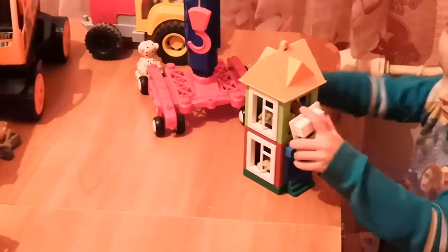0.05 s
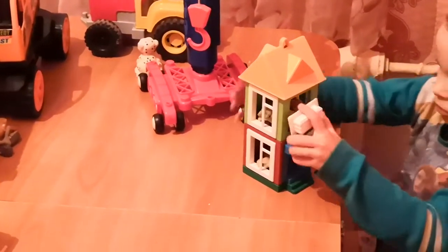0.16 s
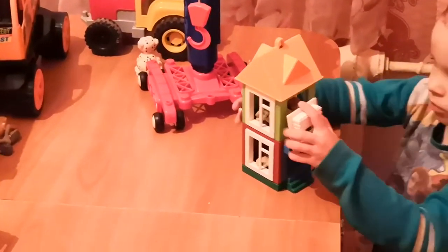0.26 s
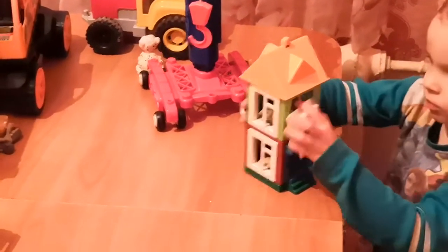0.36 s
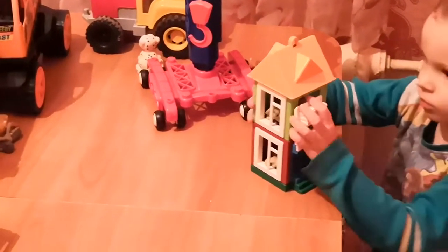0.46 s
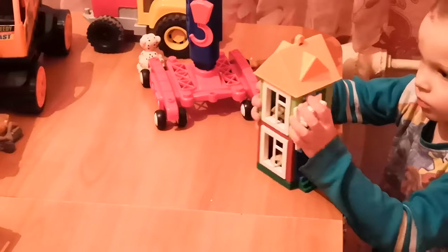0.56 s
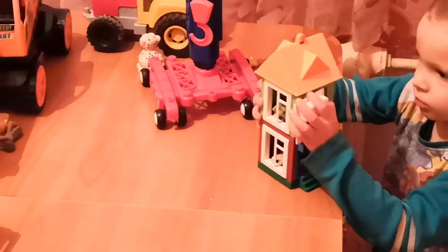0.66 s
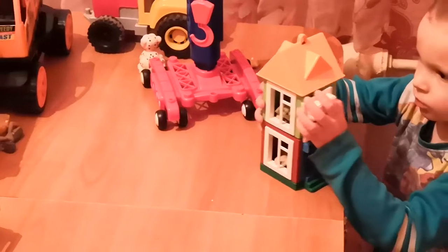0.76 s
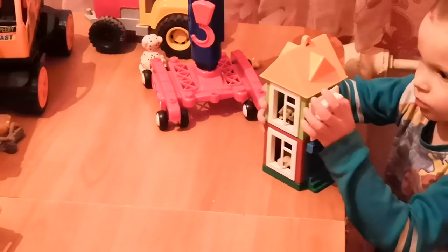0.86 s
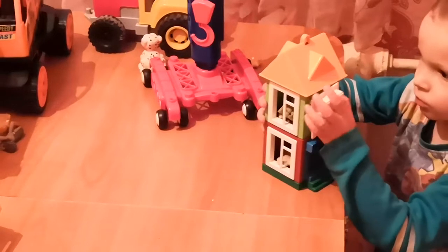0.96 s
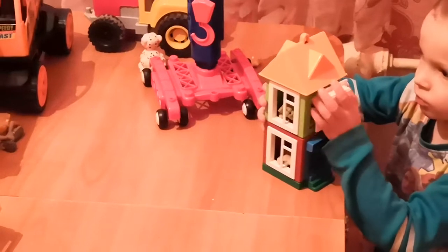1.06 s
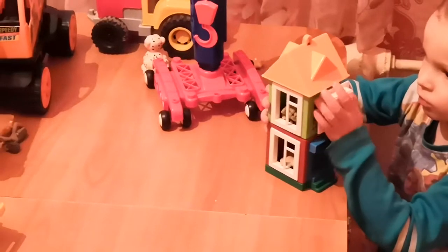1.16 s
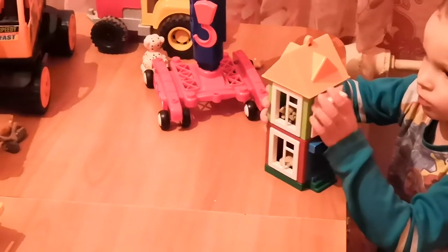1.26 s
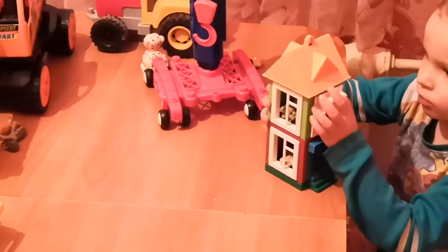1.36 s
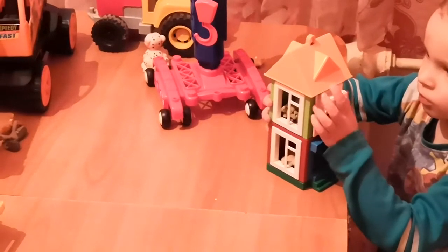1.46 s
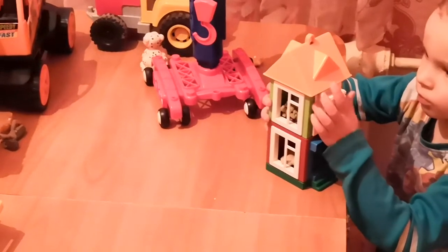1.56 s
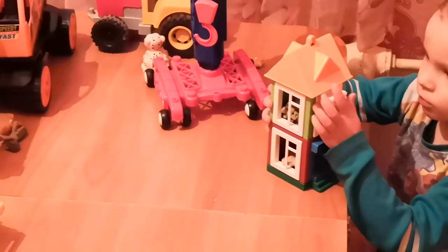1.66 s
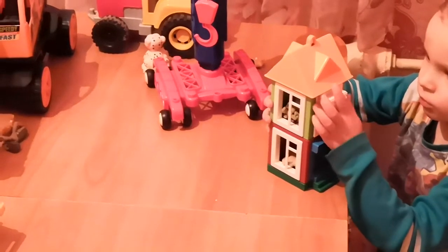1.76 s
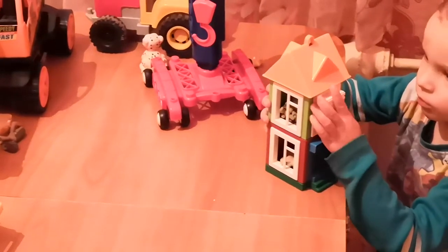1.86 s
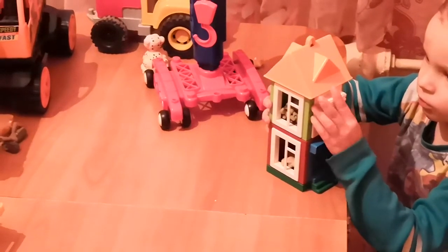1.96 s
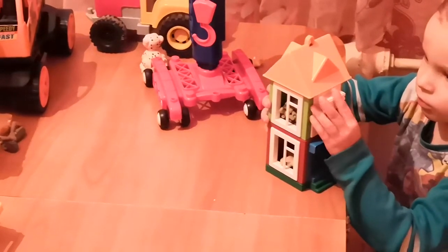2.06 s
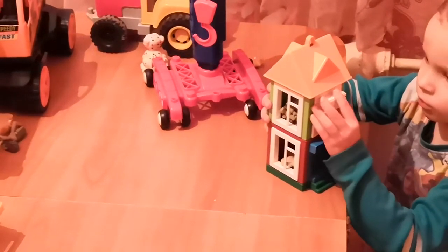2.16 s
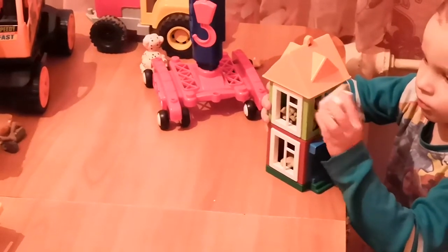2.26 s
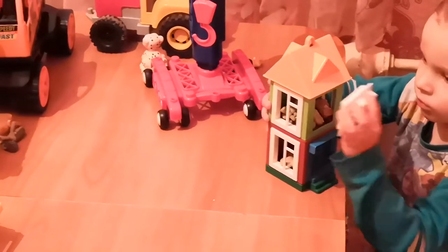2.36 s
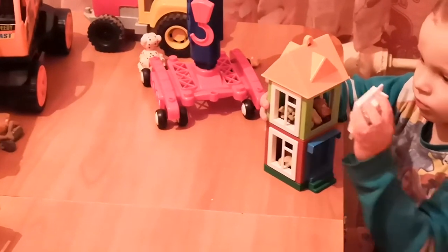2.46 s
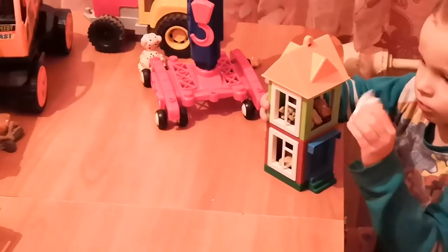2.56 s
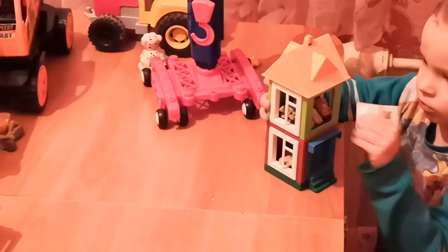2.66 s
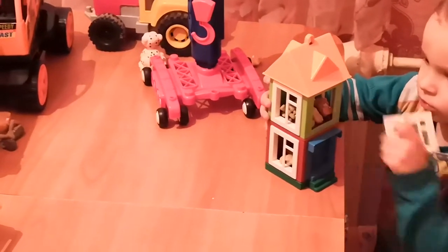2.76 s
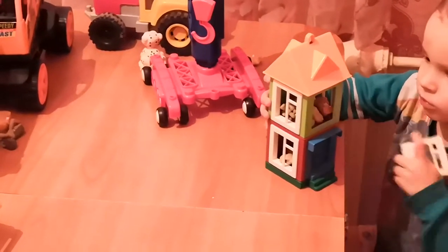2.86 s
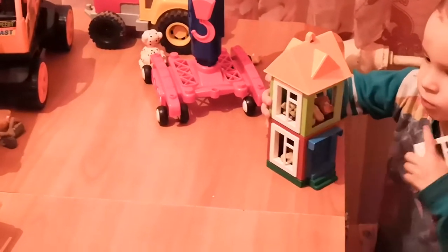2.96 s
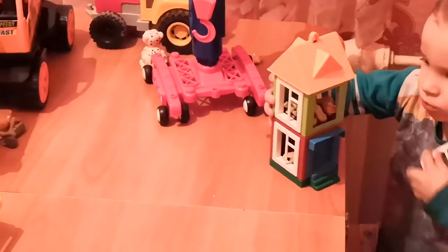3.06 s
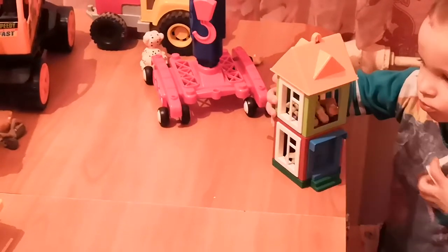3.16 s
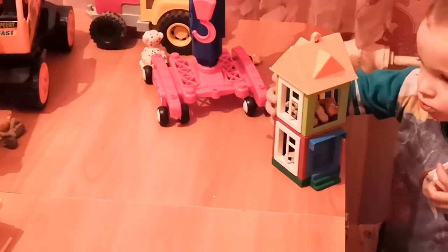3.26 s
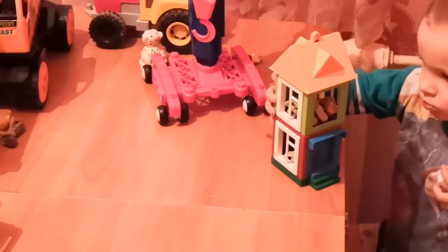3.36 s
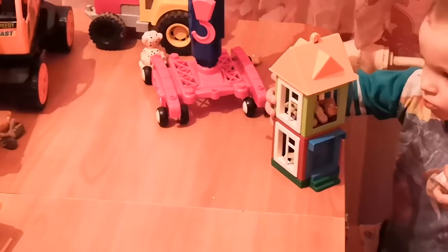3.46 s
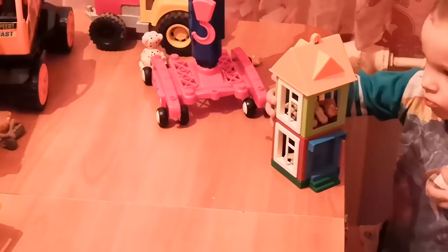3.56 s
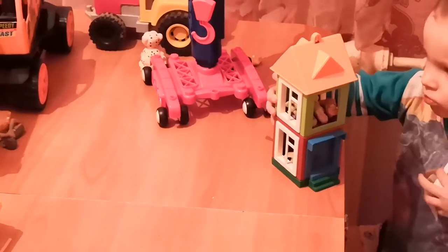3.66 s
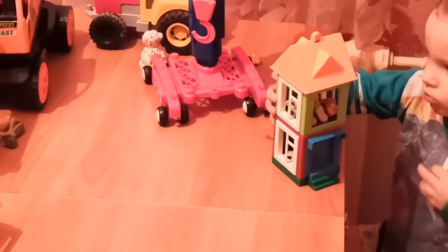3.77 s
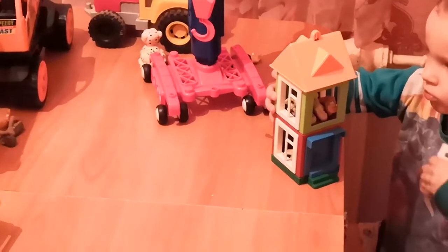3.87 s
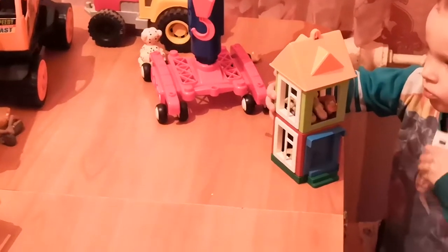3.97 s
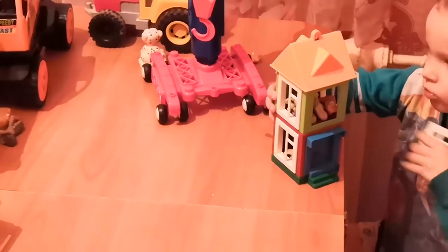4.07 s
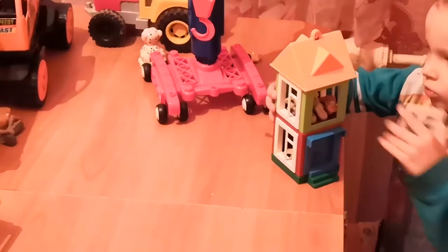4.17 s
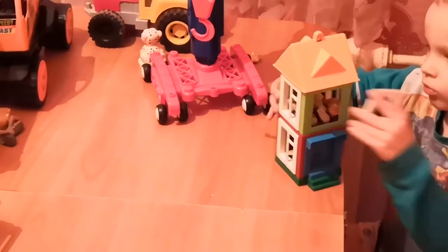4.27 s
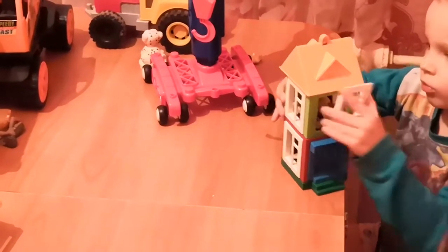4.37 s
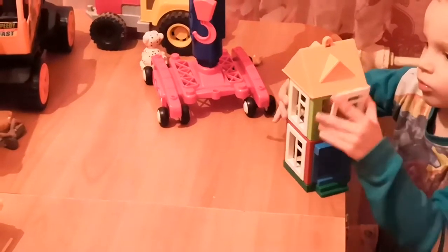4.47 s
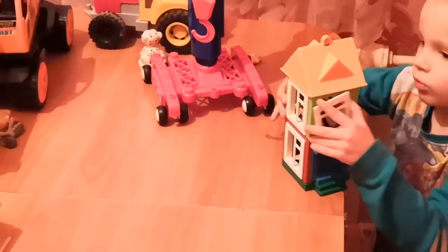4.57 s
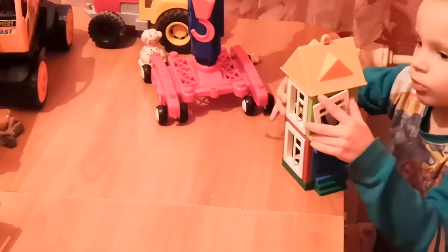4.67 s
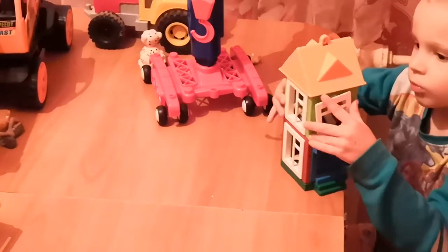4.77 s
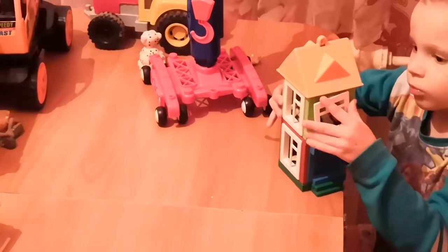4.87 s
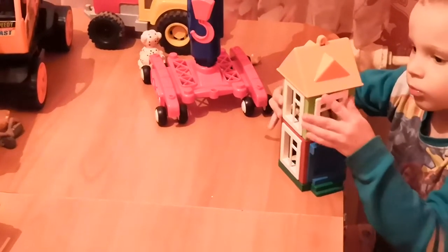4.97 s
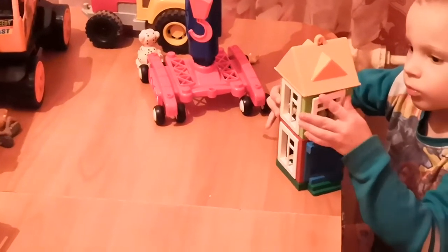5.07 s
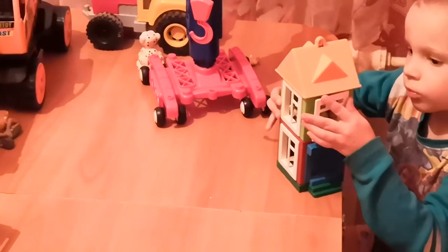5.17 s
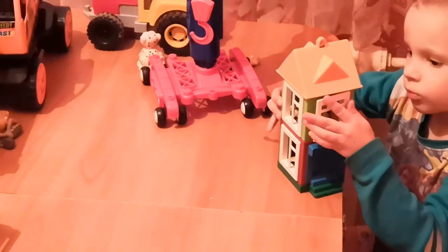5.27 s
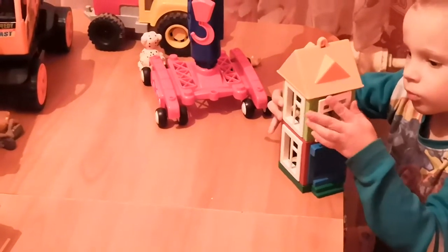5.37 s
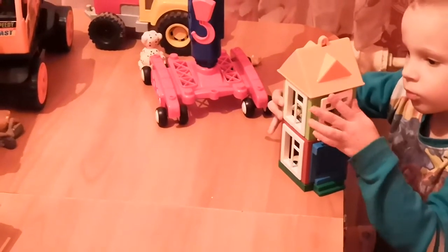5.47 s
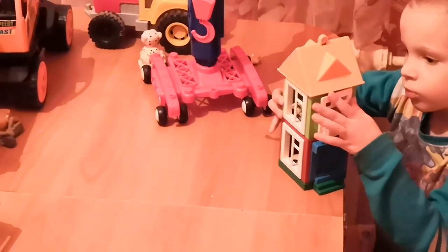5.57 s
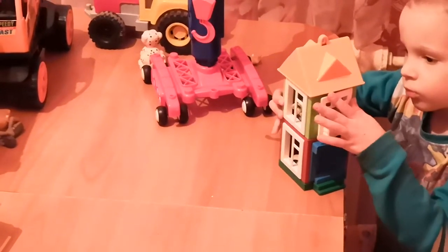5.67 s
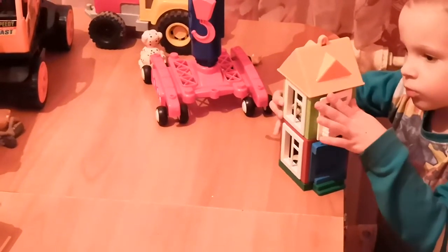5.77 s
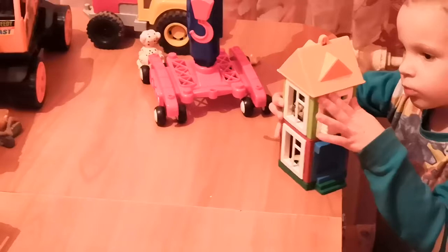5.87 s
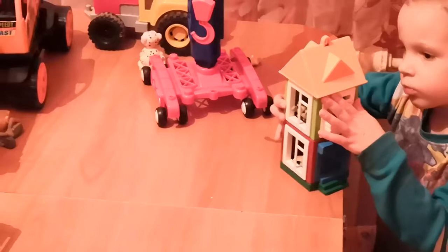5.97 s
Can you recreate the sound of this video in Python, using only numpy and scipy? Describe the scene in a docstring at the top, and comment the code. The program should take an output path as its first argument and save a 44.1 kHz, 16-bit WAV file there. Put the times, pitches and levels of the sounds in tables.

```python
"""A child fits a plastic window piece into a hollow toy house that stands on a wooden table in a small room.
Each knock is a coloured click, spread by tiny rebounds, with a table thud and decaying tones of house and table.
Coloured noise makes plastic sliding on plastic, fingers scuffing the walls and the rumble of the table;
a wobbling, sinking tone makes the scrape of the piece. Room echoes follow the knocks, over faint still air."""
import sys
import numpy as np
from scipy import signal
from scipy.fft import rfft, irfft
from scipy.io import wavfile
from scipy.ndimage import uniform_filter1d

SR = 44100
rng = np.random.default_rng(int(sys.argv[2]) if len(sys.argv) > 2 else 0)


def master(y):
    """Save y as 16-bit WAV."""
    cut = np.clip(np.atleast_2d(y).T, -1, 1)
    pcm = np.round(cut * 32767)  # scale
    wavfile.write(sys.argv[1], SR, pcm.astype(np.int16))


N = 265482  # length of the scene [samples]
HIT_SIZE = 8192  # length of one hit [samples]

# knocks of the piece: (time [s], relative clack level [dB], relative thud level [dB], relative snap level [dB],
# hardness as tilt [dB per octave], pitch of the struck spot [Hz])
KNOCKS = [(0.002, -42, -55, -84, -1.5, 1750), (0.097, -48.5, -66, -81, 0.5, 1590),
          (0.259, -39, -43, -76, 2, 1468), (0.298, -36, -60, -55, 3, 2120),
          (0.306, -25.5, -37.5, -58, -2, 1947), (0.33, -35, -36, -57, -5.5, 1110),
          (0.361, -33.5, -52, -53, 2, 2500), (0.401, -42.5, -53, -54.5, -8, 1530),
          (0.493, -33.5, -54.5, -53.5, -3, 3050), (0.633, -36.5, -54, -61, -2, 1590),
          (0.747, -44, -52.5, -64.5, -5.5, 2450), (0.773, -50.5, -51.5, -66, 12, 2580),
          (0.874, -51, -71, -76, -18.5, 895), (0.973, -47, -58.5, -55.5, 7, 1370),
          (1.017, -40.5, -57.5, -58.5, 1, 1540), (1.143, -48, -63, -84, -4, 2710),
          (1.207, -44, -55, -74, -7.5, 1500), (1.228, -26.5, -43.5, -41, 2, 2430),
          (1.448, -45, -55.5, -59, -9.5, 1520), (1.872, -52.5, -67, -66, -1.5, 2770),
          (2.143, -43.5, -65, -90, -1, 1330), (2.164, -36, -47, -68, -2, 2730),
          (2.259, -29, -29.5, -61, -10, 1020), (2.264, -29, -26.5, -48.5, -4.5, 860),
          (4.336, -28.5, -79, -49.5, 5.5, 1360), (4.483, -41.5, -64, -60.5, 1, 1040),
          (4.515, -35.5, -49, -45, 0, 1250), (4.71, -42, -59, -51, -7.5, 1670),
          (4.911, -29.5, -56, -38, 2.5, 983), (5.136, -28, -51, -47, -1.5, 1990),
          (5.413, -54, -51, -84, 0, 830), (5.807, -17.5, -42.5, -25, 2, 1010),
          (5.912, -36, -54, -61, -3, 1230)]
# colour of plastic sliding on plastic: (frequency [Hz], relative level [dB])
HISS = [(410, -73), (700, -24), (1320, -12), (1430, -12), (1900, 1), (3270, -2.5), (3770, -1), (4410, -9),
        (5860, -0.5), (6340, -11.5), (7600, -4.5), (8430, -13.5), (9350, -6.5), (14300, -34), (15500, -31)]
# the house stands to the right: left over right level [dB], delay of the left side [s]
HOUSE_PAN_DB, HOUSE_LAG_S = -6.5, 0.00061


def contacts(clack_gain_db=20, snap_gain_db=21.5, firm_s=0.00081, soft_s=0.0022):
    """Each touch is a clack of the shell and a bright snap at the edge."""
    # colour of the shell's clack: (frequency [Hz], relative level [dB])
    clack_colour = [(290, -50.5), (500, -25), (648, -12.5), (859, -6), (963, -5.5), (1110, 0.5),
                    (1260, -5.5), (1400, -0.5), (2140, -7), (2450, -3), (3150, -5.5), (3490, -12),
                    (6000, -28), (7800, -40), (13200, -120)]
    # colour of the edge's snap: (frequency [Hz], relative level [dB])
    snap_colour = [(2500, -11), (4000, 3.5), (5200, -0.5), (7400, 6), (8400, 0.5), (9600, 5),
                   (11500, -12.5), (15000, -19)]
    plastic = np.zeros((2, N))
    for s, clack_db, _, snap_db, tilt_db, spot_hz, spot_db in touches():
        clack = from_db(clack_db + clack_gain_db) * pulse(clack_colour, tilt_db, spot_hz, spot_db)
        snap = from_db(snap_db + snap_gain_db) * pulse(snap_colour)
        # bright contacts are over quickly, dull ones grind a little longer
        length_s = np.interp(snap_db - clack_db, [-25, -8], [soft_s, firm_s])
        add(plastic, s, through(clack + snap, chatter(length_s, first_touch=0.45)))
    return from_house(plastic)


def touches():
    """A knocked piece touches, then settles: weaker and duller, but with more weight on the table."""
    settle_s, settle_loss_db, settle_tilt_db = 0.0095, 10, -6.0  # tilt in dB per octave
    first_thud_db = -8.5  # thud of the first touch, against that of the settling
    first_spot_db, settle_spot_db = 6.5, 10  # how much the struck spot stands out, before hardness
    spot_per_tilt = 0.4  # a harder edge rings its spot more: dB per (dB per octave) of tilt
    rows = []
    for s, clack_db, thud_db, snap_db, tilt_db, spot_hz in KNOCKS:
        harder_db = spot_per_tilt * tilt_db
        first_spot = max(first_spot_db + harder_db, 0)
        settle_spot = max(settle_spot_db + harder_db, 0)
        # same columns as the knocks, then the boost of the spot [dB]
        rows.append((s, clack_db, thud_db + first_thud_db, snap_db, tilt_db, spot_hz, first_spot))
        rows.append((s + settle_s, clack_db - settle_loss_db, thud_db, snap_db - 2 * settle_loss_db,
                     tilt_db + settle_tilt_db, spot_hz, settle_spot))
    return rows


def chatter(length_s, first_touch):
    """A first touch, then uneven tiny rebounds on each side, spread in time with almost no colour of their own."""
    t = np.arange(HIT_SIZE) / SR
    rebounds = rng.standard_normal((2, HIT_SIZE)) ** 3 * np.sqrt(t) * np.exp(-t / length_s)
    spectrum = rfft(first_touch * (t == 0) + unit(rebounds))
    flat = spectrum / (np.abs(spectrum) + 1e-9)  # keep only the timing of each frequency
    return unit(irfft(flat)[:, :HIT_SIZE // 2])


def ringing(house_gain_db=24.0, house_per_db=1.53, table_gain_db=23, table_cut_hz=130):
    """After each knock house and table ring on; a softer knock stirs the house disproportionately less."""
    # ringing tones of the hollow house: (frequency [Hz], relative level [dB], 60 dB decay before damping [s])
    house_modes = [(862, -19, 0.087), (1077, 0, 0.24), (1130, -27, 0.72), (1455, -4.5, 0.38),
                   (1724, 6.5, 0.15), (1970, 15, 0.17), (2200, -19, 0.45), (2340, -34, 0.35),
                   (2640, 11, 0.31), (2910, 15, 0.19), (3160, 6, 0.18), (3429, -38, 0.27),
                   (3670, -24, 0.29), (3730, -36, 0.38), (3720, -35, 0.29)]
    # ringing tones of the table with the house on it, same columns
    table_modes = [(155.5, -6, 0.79), (206.7, 4, 0.12), (266.2, 0.5, 0.34), (309.7, 0, 0.16),
                   (372.6, -6, 0.25)]
    house, table = np.zeros((2, 2, N))
    hardest_db = max(row[1] for row in KNOCKS)
    for s, clack_db, thud_db, *_ in KNOCKS:
        sides = [ring(house_modes, damping=1.5, scatter_db=2.0, detune=0.0024) for side in "LR"]
        house_db = clack_db + house_gain_db + house_per_db * (clack_db - hardest_db)
        add(house, s, from_db(house_db) * panned(HOUSE_PAN_DB) * np.stack(sides))
        wood = ring(table_modes, damping=0.85, scatter_db=1.0, detune=0.0096)
        add(table, s, from_db(thud_db + table_gain_db) * wood)
    # keep deep bass out of the table's ringing
    bass_cut = signal.butter(2, table_cut_hz, "high", fs=SR, output="sos")
    return house + signal.sosfilt(bass_cut, table + 1e-18)


def ring(modes, damping, scatter_db, detune):
    """One blow on a set of dying tones; each blow varies their strength and pitch a little at random; energy one."""
    hz, db, t60 = np.transpose(modes)[:, :, None]
    t = np.arange(HIT_SIZE) / SR
    strength = from_db(db + scatter_db * rng.standard_normal(db.shape)) * rng.choice([-1, 1], db.shape)
    hz = hz * (1 + detune * rng.standard_normal(hz.shape))
    decay = from_db(-60 * t * damping / np.maximum(t60, .01))
    return unit(np.sum(strength * decay * np.sin(2 * np.pi * hz * t), axis=0))


def thuds(gain_db=17, boom_hz=203, boom_db=8):
    """The weight behind each touch thumps the tabletop, which booms briefly at one low pitch."""
    # colour of the thump: (frequency [Hz], relative level [dB])
    thump_colour = [(41, -73), (70, -65), (102, -1), (132, 3), (205, -0.5), (236, -8.5), (372, -3),
                    (462, -22), (520, -31.5), (680, -64), (1140, -120)]
    out = np.zeros((2, N))
    thump = pulse(thump_colour, spot_hz=boom_hz, spot_db=boom_db)
    for s, _, thud_db, *_ in touches():
        add(out, s, from_db(thud_db + gain_db) * thump)
    return out


def ticks(gain_db=23, pitch_db=6, tick_s=0.0025, pan_db=-9):
    """An edge slips: one very short, dry click in the colour of the sliding plastic."""
    # slips of the edge: (time [s], relative level [dB], pitch [Hz])
    slips = [(0.537, -52.5, 8050), (3.654, -46.5, 2600), (3.78, -44.5, 5500), (4.046, -49.5, 6280),
             (4.179, -53.5, 5810), (5.008, -37, 2570)]
    out = np.zeros((2, N))
    for s, db, hz in slips:
        click = pulse(HISS, 0, hz, pitch_db)
        add(out, s, from_db(db + gain_db) * through(click, chatter(tick_s, first_touch=0.31)))
    return panned(pan_db) * out


def scrape(jitter_hz=70, jitter_rate_hz=250, octave_db=-5):
    """The piece sticks and slips into its opening: a rough squeak and octave, biting, then dragging and sinking."""
    start_s, length_s = 4.34, 0.18
    start_hz, sag_hz, sag_power = 1408, 471, 1.3  # the pitch sinks as the piece closes the opening
    bite_db, drag_db, attack_s, release_db_per_s = -32, -56, 0.0035, 1100
    progress = np.clip((np.arange(N) / SR - start_s) / length_s, 0, 1)
    hz = start_hz - sag_hz * progress ** sag_power
    slow = signal.butter(2, jitter_rate_hz, fs=SR, output="sos")
    wander = signal.sosfilt(slow, rng.standard_normal((2, N)))
    pitch_wander, force_wander = unit(wander) * np.sqrt(N)
    phase = 2 * np.pi * np.cumsum(hz + jitter_hz * pitch_wander) / SR
    tone = np.sin(phase) + from_db(octave_db) * np.sin(2 * phase)
    squeak = tone * (1 + .5 * force_wander)
    bite = from_db(bite_db) * envelope(start_s, attack_s, attack_s, release_db_per_s)
    drag = from_db(drag_db) * envelope(start_s, attack_s, length_s, release_db_per_s)
    return squeak * (bite + drag)


def sliding(gain_db=-5, bright_db=-6, bright_per_db=0.8, bright_hz=5000, judder_db=1.46, judder_hz=45):
    """Plastic slides on plastic, juddering; the faster the stroke, the louder and the brighter its hiss."""
    # strokes: (start [s], length [s], relative hiss level [dB], change along the stroke [dB])
    stroke_table = [(3.528, 0.17, -55, 0), (3.64, 0.14, -54, 6), (3.823, 0.21, -43.5, -9),
                    (4.488, 0.11, -50, -5), (4.873, 0.3, -49.5, 2.5), (5.669, 0.11, -54, 7)]
    attack_s, release_db_per_s = 0.046, 210
    speeds = [from_db(db) * envelope(s, attack_s, length, release_db_per_s, change_db)
              for s, length, db, change_db in stroke_table]
    level_db = 20 * np.log10(np.max(speeds, axis=0) + 1e-9)
    high_pass = signal.butter(2, bright_hz, "high", fs=SR, output="sos")
    fine = unit(signal.sosfilt(high_pass, friction(HISS, grain_db=5.0))) * np.sqrt(N)
    brightness = from_db(bright_db + bright_per_db * (level_db - level_db.max()))
    slow = signal.butter(2, judder_hz, fs=SR, output="sos")
    judder = unit(signal.sosfilt(slow, rng.standard_normal(N))) * np.sqrt(N)
    loudness = from_db(level_db + gain_db + judder_db * judder)
    return loudness * (friction(HISS, grain_db=3.5) + brightness * fine)


def handling(scuff_gain_db=-7.5, rumble_gain_db=-3.5, rumble_lag_s=0.0096):
    """Shifting fingers scuff the shell and, a little later, rumble the table; rubbing comes from the house."""
    # fingers shifting: (middle [s], length [s], relative scuff level [dB], relative table rumble level [dB])
    grips = [(0.376, 0.34, -48.5, -49.5), (0.97, 0.11, -50, -87), (1.189, 0.12, -54, -84),
             (1.888, 0.65, -65, -68.5), (3.032, 0.21, -52, -53), (3.706, 0.18, -59, -50),
             (4.224, 0.27, -49, -47.5), (4.781, 0.14, -53.5, -52), (5.144, 0.28, -100, -53.5),
             (5.394, 0.25, -63, -63.5), (5.89, 0.13, -64, -50.5)]
    # colour of fingers on the walls: (frequency [Hz], relative level [dB])
    scuff_colour = [(320, -50), (550, -12.5), (761, -6.5), (1080, -2.5), (1560, -7.5), (1720, -2),
                    (2160, -4.5), (2540, 0.5), (3330, -12.5), (9330, -19.5), (14000, -60)]
    # colour of the table's rumble: (frequency [Hz], relative level [dB])
    rumble_colour = [(29, -50), (50, -18), (96, -13.5), (136, 3.5), (287, -13.5), (322, -7.5), (426, -35),
                     (600, -27), (780, -44), (1320, -120)]
    t = np.arange(N) / SR
    scuff, rumble = 0, 0
    for middle, length, scuff_db, rumble_db in grips:
        swell = np.cos(np.pi * np.clip((t - middle) / length, -.5, .5))
        scuff = scuff + swell * from_db(scuff_db + scuff_gain_db)
        rumble = rumble + swell * from_db(rumble_db + rumble_gain_db)
    rubbing = sliding() + scuff * friction(scuff_colour, grain_db=7) + scrape()
    late_rumble = np.interp(t - rumble_lag_s, t, rumble)
    return from_house(rubbing) + late_rumble * friction(rumble_colour, grain_db=-1.0)


def friction(spectrum, grain_db):
    """Surface bumps catch and slip: dense grains of uneven size in the given colour; rms one."""
    sizes = from_db(grain_db * np.repeat(rng.standard_normal(N // 64 + 1), 64)[:N])
    return unit(through(rng.standard_normal(N) * sizes, pulse(spectrum))) * np.sqrt(N)


def from_house(x):
    """Place a sound at the house: quieter and later on the left."""
    left, right = np.broadcast_to(x, (2, N))
    late_left = np.pad(left, (round(HOUSE_LAG_S * SR), 0))[:N]
    return panned(HOUSE_PAN_DB) * np.vstack([late_left, right])


def room(x, first_echo_s=0.00049, build_s=0.0092, shared_below_hz=270):
    """Direct sound, first reflections and dense echoes that die band by band; the bass is alike on both sides."""
    # echoes of the room: (frequency [Hz], 60 dB decay [s], echoes over direct sound [dB])
    room_bands = [(102, 0.28, -0.5), (278, 0.56, 3.5), (685, 0.32, 4.5), (1290, 0.26, 7), (3040, 0.29, 3.5),
                  (5850, 0.22, 1.5), (11800, 0.16, 0)]
    t = np.arange(SR * 2 // 3) / SR
    edges = 45 * 2 ** np.arange(0, 8.6, .5)  # half-octave bands [Hz]
    white = rng.standard_normal((2, 3, len(t)))  # left, right and shared; neighbouring bands take turns
    echoes = 0
    onset = 1 - np.exp(-np.maximum(t - first_echo_s, 0) / build_s)
    for k, (low, high) in enumerate(zip(edges, edges[1:])):
        hz = np.sqrt(low * high)
        band_pass = signal.butter(2, [low, high], "band", fs=SR, output="sos")
        band = signal.sosfilt(band_pass, white[k % 2])
        alike = 1 / (1 + ((hz / shared_below_hz) ** 2) ** 2)
        band = np.sqrt(alike) * band[2] + np.sqrt(1 - alike) * band[:2]
        dying = unit(band * onset * from_db(-60 * t / at_hz(room_bands, hz)))
        band_share = np.sqrt(2 * (high - low) / SR)
        echoes = echoes + dying * band_share * from_db(at_hz(room_bands, hz, axis=2))
    return reflected(x) + through(x, echoes)


def reflected(x):
    """The tabletop and nearby walls return sharp copies of a sound."""
    # tabletop and walls: (delay to the left [s], delay to the right [s], level of the copy [dB])
    near_surfaces = [(.0021, 0.0023, -5), (.0052, 0.0043, -6.5), (.0098, 0.0074, -17.5),
                     (0.0152, 0.0086, -16.5)]
    out = x.copy()
    for left_s, right_s, db in near_surfaces:
        for side, s in enumerate((left_s, right_s)):
            add(out[side:side + 1], s, from_db(db) * x[side:side + 1])
    return out


def air(low_db=-67.5, high_db=-65.5, side_db=-18):
    """A faint low murmur of the building, nearly alike on both sides, under a thin even hiss."""
    # colour of the murmur: (frequency [Hz], relative level [dB])
    murmur_colour = [(12, -46.5), (20, -25), (22, -18), (65, 3), (92, -11.5), (139, -3.5), (161, -17),
                     (197, -7), (500, -28.5), (650, -72), (1100, -120)]
    # colour of the thin hiss: (frequency [Hz], relative level [dB])
    thin_colour = [(240, -41.5), (400, -8), (687, -7.5), (839, -5), (1160, -2), (1330, -5), (1600, -1),
                   (2120, -1), (4180, -10.5), (7060, -13), (16000, -24)]
    murmur = rng.standard_normal(N) + from_db(side_db) * rng.standard_normal((2, N))
    low = through(murmur, pulse(murmur_colour))
    high = through(rng.standard_normal((2, N)), pulse(thin_colour))
    return from_db(low_db) * low + from_db(high_db) * high


def pulse(spectrum, tilt_db=0, spot_hz=1000, spot_db=0, spot_octaves=0.22, skirt_db=30):
    """The sharpest click of this colour with no sound ahead of it, tilted and raised round one pitch; energy one."""
    hz = np.maximum(np.arange(HIT_SIZE // 2 + 1) * SR / HIT_SIZE, 1)
    octaves_outside = np.abs(np.log2(hz / np.clip(hz, spectrum[0][0], spectrum[-1][0])))
    db = at_hz(spectrum, hz) - skirt_db * np.minimum(octaves_outside, 2)
    db = db + tilt_db * np.log2(np.clip(hz, 750, 3300))  # only the middle range is tilted
    db = db + spot_db * np.exp(-(np.log2(hz / spot_hz) / spot_octaves) ** 2)
    # minimum phase: fold the cepstrum so that the energy comes as early as it can
    cepstrum = irfft(np.log(from_db(db)))[:HIT_SIZE // 2]
    return unit(irfft(np.exp(2 * rfft(cepstrum, HIT_SIZE) - cepstrum[0])))


def envelope(start_s, attack_s, length_s, release_db_per_s, change_db=0):
    """Rise, hold with a steady change to the end of the length, then die away."""
    age = np.arange(N) / SR - start_s
    release_db = np.clip(release_db_per_s * (age - length_s), 0, 200)
    change = change_db * np.clip(age / length_s, 0, 1)
    return np.clip(age / attack_s, 0, 1) * from_db(change - release_db)


def panned(pan_db):
    """Left and right gains for a left-right difference, power kept."""
    return np.sqrt(2) * unit(from_db([pan_db / 2, -pan_db / 2]))[:, None]


def from_db(db):
    """Decibels to gain."""
    return 10 ** (np.asarray(db) / 20)


def unit(x):
    """Scale to an energy of one."""
    return x / np.sqrt(np.sum(x ** 2, axis=-1, keepdims=True) + 1e-20)


def at_hz(points, hz, axis=1):
    """Read a column of a table on a log-frequency axis."""
    rows = np.array(points, float)
    return np.interp(np.log(hz), np.log(rows[:, 0]), rows[:, axis])


def through(x, response):
    """Pass a signal through an impulse response, keeping its length."""
    return signal.fftconvolve(np.atleast_2d(x), np.atleast_2d(response), axes=-1)[:, :np.shape(x)[-1]]


def add(out, s, sound):
    """Mix a sound in at a time in seconds."""
    start = int(np.clip(round(s * SR), 0, N - 1))
    out[:, start:start + sound.shape[-1]] += sound[..., :N - start]


def scene(thud_room_db=-2.0):
    """Contacts and handling in the room, drier thuds, ringing of house and table, dry ticks, still air."""
    table = thuds()
    in_room = room(contacts() + handling() + from_db(thud_room_db) * table)
    return in_room + table + ringing() + ticks() + air()


def record(dry, open_db=-46, range_db=8, depth_db=5, cutoff_hz=15800):
    """A noise suppressor turns quiet moments down, cutting the tails short; the top is cut steeply."""
    power = uniform_filter1d(np.mean(dry ** 2, axis=0), size=880)  # averaged over 20 ms
    level_db = 10 * np.log10(np.abs(power) + 1e-12)
    quiet = np.clip((open_db - level_db) / range_db, 0, 1)
    top_cut = signal.ellip(10, .1, 80, cutoff_hz, fs=SR, output="sos")
    return signal.sosfilt(top_cut, dry * from_db(-depth_db * quiet))


dry = scene()
out = record(dry)
master(out)
```